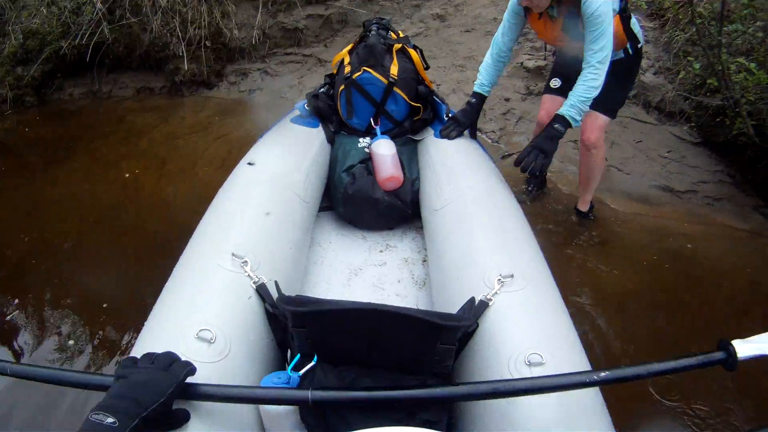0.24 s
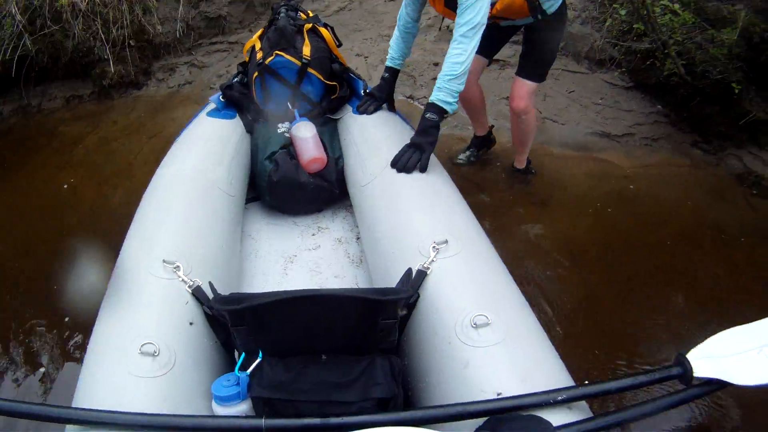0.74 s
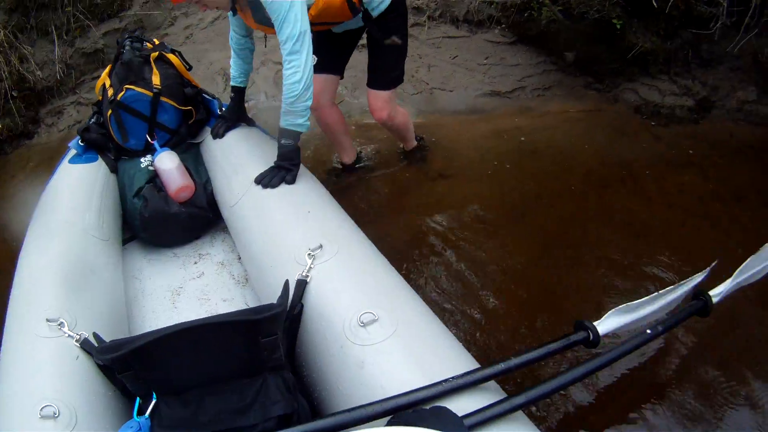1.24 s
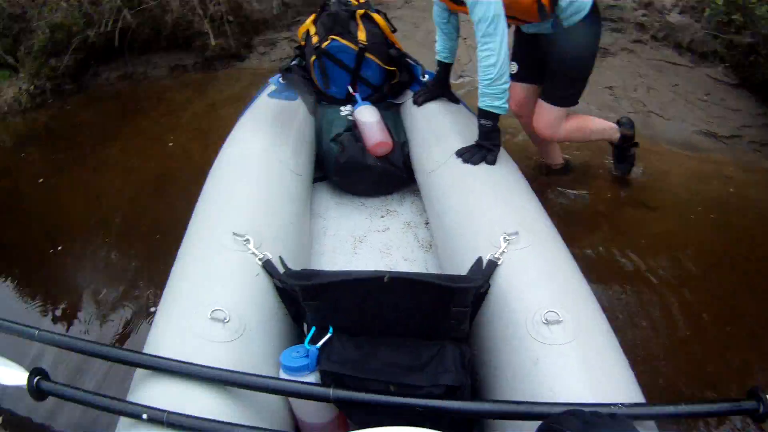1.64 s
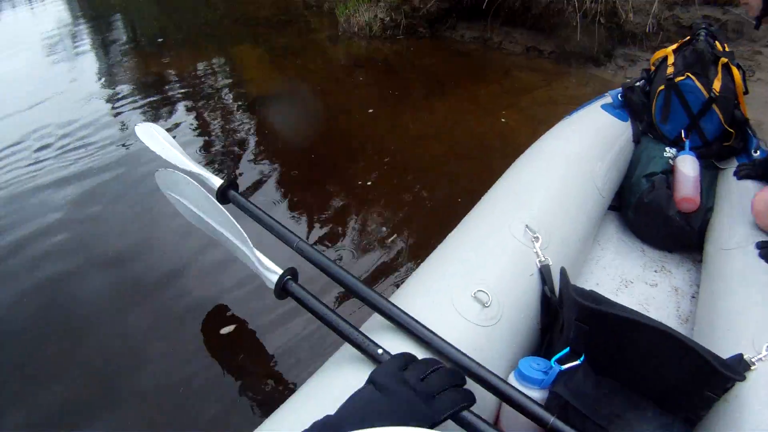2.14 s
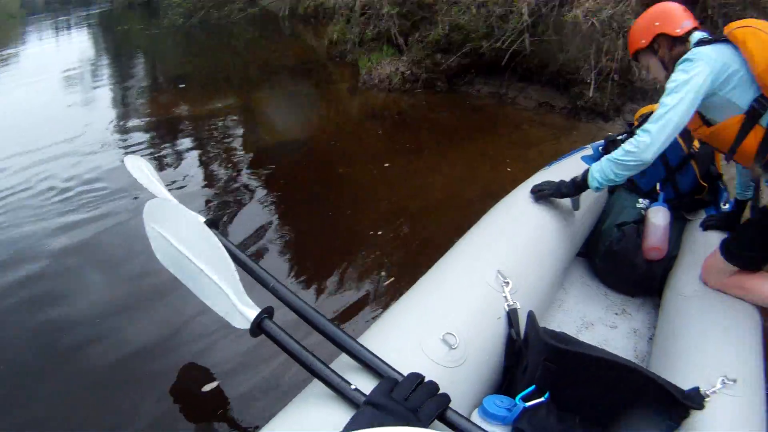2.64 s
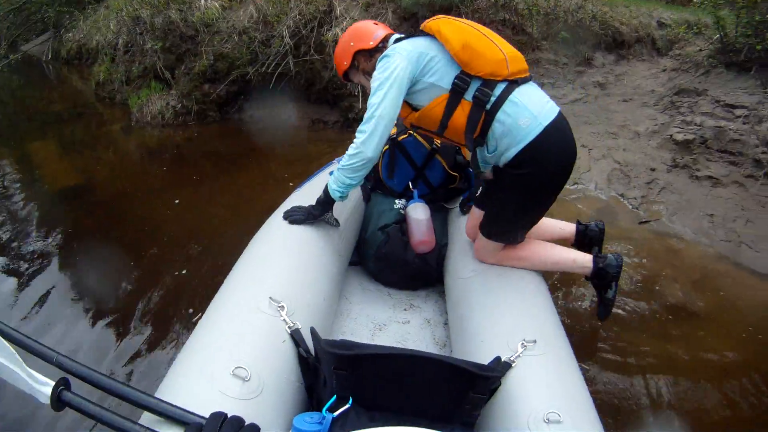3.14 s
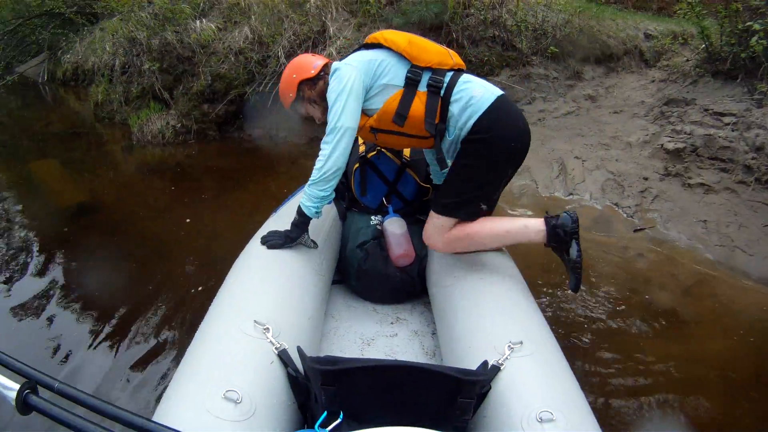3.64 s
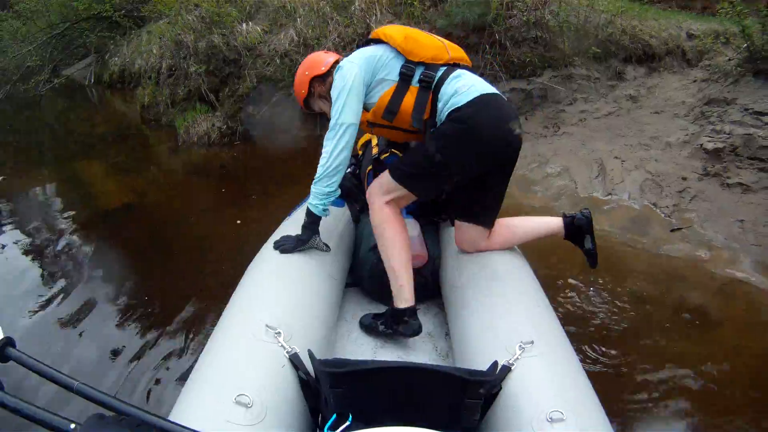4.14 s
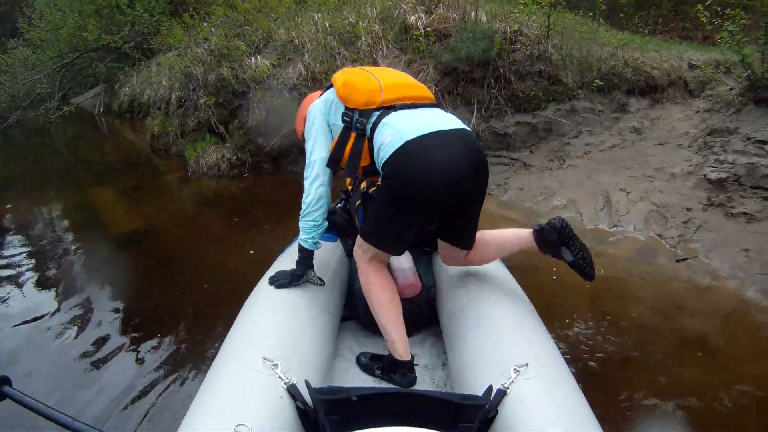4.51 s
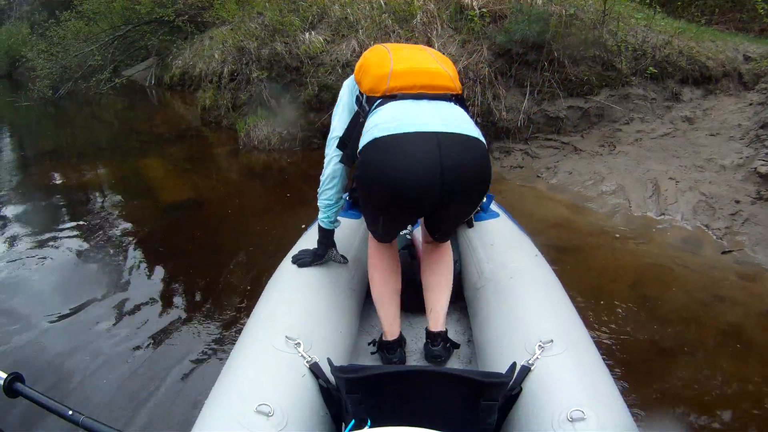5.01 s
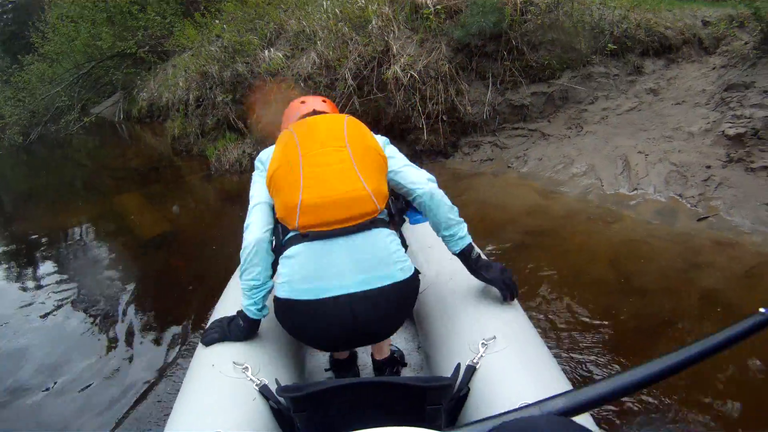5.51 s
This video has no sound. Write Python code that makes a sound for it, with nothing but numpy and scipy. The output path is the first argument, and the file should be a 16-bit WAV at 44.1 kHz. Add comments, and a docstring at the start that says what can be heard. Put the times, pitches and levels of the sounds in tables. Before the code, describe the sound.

Faint water lapping and a low hull rumble surround an inflatable kayak at a quiet riverbank, heard close through a small onboard camera with steady hiss and a glassy treble. Paddle shafts tick at about 0.7 seconds. At 0.9 seconds comes the loudest sound: a paddle thumps the air tube with a short, deep boom, jolting the microphone into a crackle and creak on the left. Clothing scuffs, and from 1.2 to 1.4 seconds the blade judders over the rubber. Until about 3 seconds, light ticks of shafts and buckles mix with soft bumps, dull knocks and faint hollow sloshes. Wet shoes drip into the water from 3 to 3.9 seconds, with a sharper click at 3.2. A few small ticks follow over the hiss. Around 5.6 seconds the person's weight comes down with soft thuds, a cluster of knocks and a brief clothing scuff.

```python
"""A paddle bumps onto the air tube of an inflatable kayak, and the air inside booms, as someone climbs in.
The blade judders over the rubber, shafts and buckles tick, hard things knock the hull and clothing scuffs.
Water laps and sloshes round the rocking boat at a quiet riverbank, wet shoes drip, and the tubes thud
softly as the weight comes down. A small waterproof camera aboard hears it all: the hardest blow jolts
its microphone port, and it adds a steady hiss and a glassy treble."""
import sys
import numpy as np
from scipy import signal
from scipy.fft import rfft, irfft
from scipy.io import wavfile

SR = 44100
rng = np.random.default_rng(int(sys.argv[2]) if len(sys.argv) > 2 else 0)


def master(y):
    """Save y as 16-bit WAV."""
    cut = np.clip(np.atleast_2d(y).T, -1, 1)
    pcm = np.round(cut * 32767)  # scale
    wavfile.write(sys.argv[1], SR, pcm.astype(np.int16))


N = 254319
TIME = np.arange(N) / SR


def from_db(db):
    """Decibels to gain."""
    return 10 ** (np.asarray(db) / 20)


def rms_one(x):
    """Scale to unit rms."""
    return x / np.sqrt(np.mean(x ** 2) + 1e-20)


def coloured(x, colour):
    """Shape a signal with an EQ curve of (Hz, dB) points; rms 1."""
    hz, db = np.transpose(colour)
    bins = np.fft.rfftfreq(N, 1 / SR) + 1
    gain = from_db(np.interp(np.log(bins), np.log(hz), db))
    return rms_one(irfft(rfft(x) * gain, N))


def drift(rate):
    """A random wander, with rate new values a second."""
    return np.interp(TIME * rate, np.arange(N // 10), rng.standard_normal(N // 10))


def resonance(x, hz, width_hz):
    """Two-pole band-pass with gain 1 at its peak."""
    r = np.exp(-np.pi * width_hz / SR)
    poles = [1, -2 * r * np.cos(2 * np.pi * hz / SR), r * r]
    return signal.lfilter(np.array([1, 0, -1]) * (1 - r * r) / 2, poles, x + 1e-18)


def ring(x, hz, t60):
    """A unit click sets a sine of height 1 ringing; it falls 60 dB in t60 seconds."""
    r, w = np.exp(-np.log(1000) / (t60 * SR)), 2 * np.pi * hz / SR
    return signal.lfilter([0, np.sin(w)], [1, -2 * r * np.cos(w), r * r], x + 1e-18)


def add(out, s, sound):
    """Mix a short sound in at time s."""
    start = round(s * SR)
    out[start:start + len(sound)] += sound[:N - start]


def envelope(start_s, length_s, attack_s, release_s):
    """Swell up to the start, hold for the length, then die away."""
    swell = np.minimum(TIME - start_s, 0) / attack_s
    decay = np.maximum(TIME - start_s - length_s, 0) / release_s
    return np.exp(swell - decay) + 1e-12


def contact(chatter_s, grit, size=3000):
    """A first touch followed by a dying chatter of tiny ones."""
    force = grit * rng.standard_normal(size) * np.exp(-TIME[:size] / chatter_s)
    force[0] += 1
    return force


def stick_slip(rate_hz):
    """One unit click each time a sticking surface lets go."""
    cycles = np.cumsum(rate_hz) / SR
    return np.diff(np.floor(cycles), prepend=0)


# Shoves that rock the hull. Each row: crest time in seconds, rumble level in dB.
SHOVES = [(0.0, -51.5), (0.9, -59), (1.3, -54), (5.6, -60)]
# The tone of the lapping and of the hull's rumble. Each row: frequency in Hz, relative level in dB.
LAPPING_EQ = [(100, 1.5), (280, 2.5), (430, -1.5), (600, -1.5), (850, -1), (1200, -7), (1800, -3),
              (3000, -22), (5800, -22.5)]
RUMBLE_EQ = [(10, -1.5), (20, 10), (40, -9.5), (68, 1), (100, -21), (180, -35.5), (400, -75)]

def river(calm_rumble_db=-63, calm_lap_db=-63, follow_power=0.089):
    """Each shove sets the hull rocking and rumbling until it settles; the water laps louder meanwhile."""
    swells = sum(from_db(db) * envelope(s, 0, attack_s=0.09, release_s=0.83) for s, db in SHOVES)
    rocking = from_db(calm_rumble_db) + swells
    stirred = (rocking / from_db(calm_rumble_db)) ** follow_power
    lapping = from_db(calm_lap_db + drift(24.78)) * coloured(rng.standard_normal(N), LAPPING_EQ)
    rumble = coloured(rng.standard_normal(N), RUMBLE_EQ)
    return stirred * lapping + rocking * rumble


# The tone of the hiss. Each row: frequency in Hz, relative level in dB.
PORT_EQ = [(100, 4), (500, -20), (1300, -12.5), (1800, -27), (2100, 1), (2380, 3.5), (2600, -1),
           (2900, -13), (3400, -11.5), (4200, -16), (5200, -18), (5900, -12)]

def hiss(shared_db=-57, own_db=-71.5):
    """Steady hiss peaked by the sealed port; each microphone adds a faint white hiss of its own."""
    shared = from_db(shared_db) * coloured(rng.standard_normal(N), PORT_EQ)
    return shared + from_db(own_db) * rng.standard_normal((2, N))


# Blows on the air tubes. Each row: time in seconds, peak of the dent in dB.
TUBE_BLOWS = [(0.597, -46.5), (0.8762, -6), (1.02, -37), (1.162, -31.5), (1.776, -49), (2.116, -39.5),
              (2.292, -50), (2.412, -41), (2.760, -47), (5.6348, -29), (5.657, -30.5), (5.704, -39.5)]
BOOM_HZ = 67.8

def bumps(rebound=0.94, boom_t60=0.24):
    """The tube dents and springs back, then the air in it booms."""
    push, kicks = np.zeros((2, N))
    for s, db in TUBE_BLOWS:
        # softer blows last longer and boom more for their size
        contact_s = 0.004 * from_db(-0.066 * db)
        boom_db = db - 14 - 0.36 * db
        dent = 1 / np.cosh(np.clip((TIME - s) / contact_s, -20, 20))
        push += from_db(db) * dent * ((1 + rebound) * dent ** 2 - rebound)
        add(kicks, s, -from_db([boom_db]))
    boom = ring(kicks, BOOM_HZ, boom_t60)
    quarter_cycle_s = 0.25 / BOOM_HZ
    return push + np.interp(TIME - quarter_cycle_s, TIME, boom)


# Paddle shafts and buckles. Each row: start in seconds, peak in dB, pitch in Hz, brightness in dB.
GEAR_TICKS = [(.7424, -24.5, 2324, -8), (0.8445, -30, 2330, -6.5), (1.0134, -31.5, 2416, -15),
              (1.417, -34.5, 2470, -31), (1.6101, -39, 2300, 4), (1.872, -31.5, 2120, -7.5),
              (2.044, -35.5, 2400, -6.5), (2.0864, -38, 2170, -11), (2.6602, -44, 2070, -9),
              (2.852, -39.5, 2250, -4.5), (3.17, -28.5, 2006, -1), (3.8507, -40.5, 2140, -8),
              (4.0944, -39, 3200, 3), (4.9012, -43, 1700, -8), (5.674, -41, 3430, -14)]
# Side modes of every tick. Each row: frequency in Hz, relative level in dB, t60 in seconds.
GEAR_MODES = [(1590, 3, 0.0013), (3544, 0.5, 0.0061), (3900, -17, 0.0055), (5040, -2, 0.0024)]

def ticks(t60=0.017):
    """Small hard contacts ring for a few milliseconds; sharper ones excite more of the side modes."""
    out = np.zeros(N)
    for s, db, hz, bright_db in GEAR_TICKS:
        force = contact(chatter_s=0.021 * from_db(0.64 * db), grit=0.63)   # softer ticks settle sooner
        side_modes = sum(from_db(mode_db + bright_db) * ring(force, mode_hz, mode_t60)
                         for mode_hz, mode_db, mode_t60 in GEAR_MODES)
        tick = ring(force, hz, t60) - side_modes
        add(out, s, from_db(db) * tick / np.abs(tick).max())
    return out


# Hard things touching the hull. Each row: start in seconds, peak in dB, pitch in Hz.
HULL_KNOCKS = [(0.776, -40.5, 900), (0.8613, -25.5, 776), (1.543, -46, 795), (2.852, -42, 794),
               (3.172, -43, 810), (5.413, -47.5, 800), (5.624, -38.5, 513), (5.6751, -32.5, 1036),
               (5.676, -35.5, 620)]

def knocks(t60=0.024):
    """A touch on the hull rings three quickly dying modes: a short, dull knock."""
    out = np.zeros(N)
    for s, db, hz in HULL_KNOCKS:
        force = contact(chatter_s=0.0058, grit=0.12)
        overtone = from_db(-4) * ring(force, hz * 1.31, t60 / 2)
        edge = from_db(-10) * ring(force, hz * 1.92, t60 / 2)
        knock = ring(force, hz, t60) + overtone + edge
        add(out, s, from_db(db) * knock / np.abs(knock).max())
    return out


# Clothing on rubber. Each row: start in seconds, length in seconds, level in dB, fade in dB per second.
CLOTH_SCUFFS = [(0.865, 0.13, -45.5, 108), (1.009, 0.194, -51.5, 14), (5.635, 0.017, -52.5, 0),
                (5.657, .11, -45.5, 125)]
# The tone of the cloth. Each row: frequency in Hz, relative level in dB.
CLOTH_EQ = [(100, -21), (300, -12), (550, 1.5), (800, 3.5), (1050, 3.5), (1500, -10), (2200, 0.5),
            (2600, -3), (3000, -13), (3500, 2.5), (3950, -19), (5200, -22), (5900, -17)]

def scuffs(grain_db=1.5):
    """Cloth catches on the rubber in fine clumped grains; each scuff fades as the sliding slows."""
    level = np.zeros(N)
    for s, length_s, db, fade_db_per_s in CLOTH_SCUFFS:
        fading = from_db(db - fade_db_per_s * np.clip(TIME - s, 0, length_s))
        level += fading * envelope(s, length_s, attack_s=0.005, release_s=0.0027)
    grains = rng.standard_normal(N) * from_db(grain_db * drift(350))
    return level * coloured(grains, CLOTH_EQ)


def jolt(start_s=0.8769, snap_db=-4, crackle_db=-30, rock_db=-26, rock_lag_s=0.01):
    """The hardest blow snaps the left microphone port back with a crackle; the camera rocks sideways."""
    kick, chatter = np.zeros((2, N))
    add(kick, start_s, np.ones(1))
    add(chatter, start_s, contact(chatter_s=0.0047, grit=0.36))
    crackle = resonance(chatter, hz=3000, width_hz=2600)
    crackle *= from_db(crackle_db) / np.abs(crackle).max()
    snap = from_db(snap_db) * ring(kick, hz=75, t60=0.027)
    rock = from_db(rock_db) * np.interp(TIME - rock_lag_s, TIME, ring(kick, hz=67, t60=0.15))
    return np.array([crackle - snap - rock, rock])


def creak(start_s=0.893, end_s=0.98, slip_hz=270, step_db=-36, leak_s=0.0033):
    """The jolted left port creeps back; each slip is a small pressure step that leaks away."""
    slips = stick_slip(slip_hz * np.exp(0.25 * drift(250))) * (TIME > start_s) * (TIME < end_s)
    heights = from_db(step_db + 3 * drift(200))
    steps = signal.lfilter([1], [1, -np.exp(-1 / (leak_s * SR))], slips * heights + 1e-18)
    return np.array([steps, np.zeros(N)])


# The ring of the dragged paddle. Each row: frequency in Hz, width in Hz, relative level in dB.
PADDLE_MODES = [(284, 48, -2), (536, 60, 2), (729, 103, 1), (844, 114, 1.5), (1022, 162, -3.5),
                (1570, 130, -11.5), (2060, 280, -5), (2320, 640, -15.5), (3380, 280, -19.5),
                (5150, 170, -20)]

def drag(start_s=1.167, hardest_s=1.329, end_s=1.389, slip_hz=72, boom_db=-5, top_hz=2700):
    """The paddle sticks and slips on rubber in a fast judder; pressing harder brings out the low modes."""
    pressure = np.sin(np.pi / 2 * np.interp(TIME, [start_s, hardest_s, end_s], [0, 1, 0]))
    stroke = envelope(start_s, end_s - start_s, attack_s=0.015, release_s=0.0026)
    level = stroke * from_db(-39 + 7 * pressure)
    weight = from_db(-8 + 8.5 * pressure)
    slips = stick_slip(slip_hz * (1 + 0.06 * drift(60)))
    judder = rms_one(signal.fftconvolve(slips, contact(chatter_s=0.014, grit=0.88))[:N])
    force = (judder + rng.standard_normal(N)) * from_db(2 * drift(150))
    modes = sum((-1) ** k * from_db(db + 3 * drift(40.03)) * resonance(force, hz, width)
                for k, (hz, width, db) in enumerate(PADDLE_MODES))
    soft_rubber = signal.butter(2, top_hz, fs=SR, output="sos")   # dulls the top
    body = rms_one(signal.sosfilt(soft_rubber, modes))
    body += (weight - 1) * resonance(body, hz=600, width_hz=400)
    shove = rms_one(slips) + rng.standard_normal(N)
    tube = resonance(resonance(shove * level, BOOM_HZ, 18), BOOM_HZ, 52)   # booms on after the drag stops
    tube /= resonance(shove, BOOM_HZ, 15).std()
    return level * body + from_db(boom_db) * tube


# Sloshes as the boat takes weight. Each row: start in seconds, length in seconds, level in dB, pitch ratio.
TUBE_SLOSHES = [(1.779, 0.078, -58.5, 1.01), (2.035, .1, -63, 1), (2.326, 0.065, -62.5, 0.98),
                (2.696, 0.02, -63.5, 0.977)]
# Their hollow notes. Each row: frequency in Hz at pitch ratio 1, width in Hz, relative level in dB.
GAP_MODES = [(267, 31, 2.5), (353, 73, -5.5), (727, 83, -0.5), (838, 42, -0.5), (1590, 330, -20.5)]

def slosh(gulp_db=3.5):
    """Water gulps in the gap between tube and river; the gap's size sets the pitch of each slosh."""
    out = np.zeros(N)
    gulps = rng.standard_normal(N) * from_db(gulp_db * drift(45))
    for s, length_s, db, pitch in TUBE_SLOSHES:
        notes = sum(from_db(mode_db) * resonance(gulps, pitch * hz, width)
                    for hz, width, mode_db in GAP_MODES)
        out += from_db(db) * envelope(s, length_s, attack_s=0.053, release_s=0.084) * rms_one(notes)
    return out


# The biggest drops from wet shoes. Each row: start in seconds, level in dB, starting pitch in Hz.
BIG_DROPS = [(2.059, -47.5, 2650), (2.982, -44.5, 2270), (3.076, -47, 2340), (3.331, -48, 2090),
             (3.589, -47.5, 2550), (3.846, -54, 2900)]

def drips(drops, rise_s=0.0019, glide=4.3, splash=0.18, size=1500):
    """Each drop splashes and traps a small bubble whose note swells, climbs and dies."""
    out, t = np.zeros(N), TIME[:size]
    for s, db, hz in drops:
        bubble = np.sin(2 * np.pi * hz * t * (1 + glide * t))
        spray = rms_one(resonance(rng.standard_normal(size), hz, width_hz=1200))
        swell = t / rise_s * np.exp(1 - t / rise_s)
        add(out, s, from_db(db) * swell * (bubble + splash * spray))
    return out


def dribble(start_s=3.25, end_s=3.9, db=-57.5, hz=2720, spread_octaves=0.13, count=7):
    """Smaller drops fall at random while the feet hang over the water; gives rows for drips()."""
    times = rng.uniform(start_s, end_s, count)
    levels = db + 0.5 * rng.standard_normal(count)
    pitches = hz * 2 ** (spread_octaves * rng.standard_normal(count))
    return list(zip(times, levels, pitches))


def scene():
    """Boat and water reach both ports alike; only the camera's own noises differ left and right."""
    camera = hiss() + jolt() + creak()
    boat = bumps() + knocks() + ticks() + drag() + scuffs()
    water = drips(BIG_DROPS + dribble()) + slosh() + river()
    return boat + water + camera


def record(dry, cutoff_hz=15600):
    """The camera samples at 12 kHz and holds each value, which mirrors the sound into a glassy treble."""
    anti_alias = signal.firwin(6001, 5600, fs=40 * SR)
    coarse = signal.resample_poly(dry, 40, 147, axis=-1, window=anti_alias)   # 12 kHz
    held = np.repeat(coarse, 4, axis=-1)   # 48 kHz
    glassy = signal.resample_poly(held, 147, 160, axis=-1)[:, :N]   # back to SR
    return signal.sosfilt(signal.ellip(10, 0.1, 90, cutoff_hz, fs=SR, output="sos"), glassy)


dry = scene()
out = record(dry)
master(out)
```